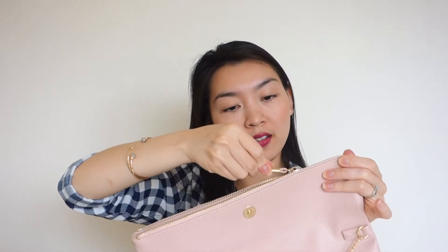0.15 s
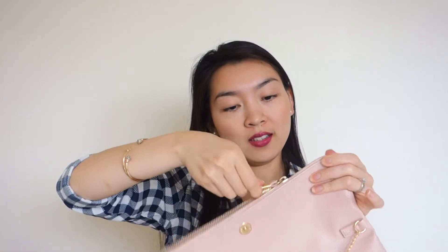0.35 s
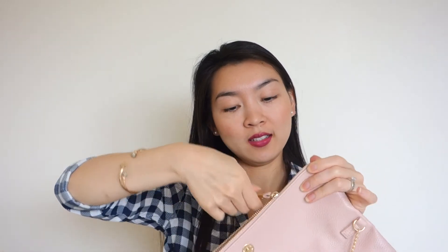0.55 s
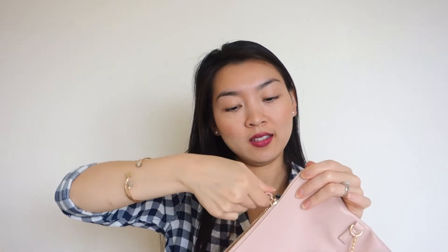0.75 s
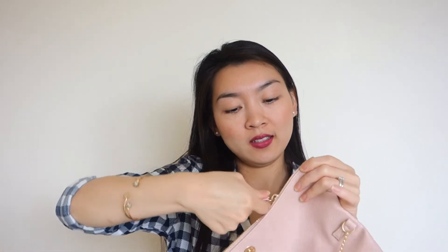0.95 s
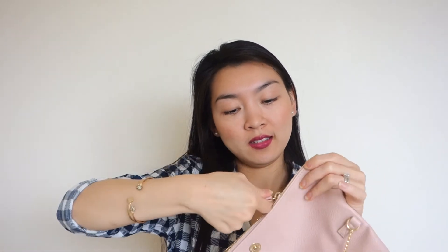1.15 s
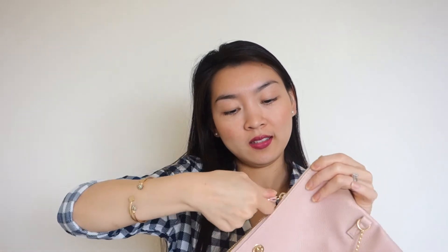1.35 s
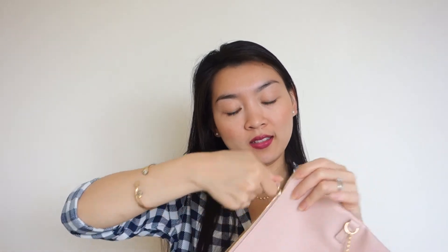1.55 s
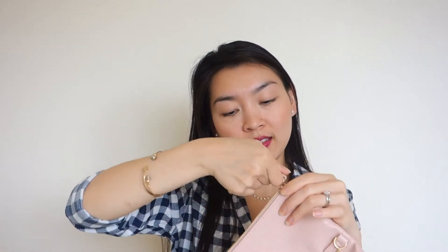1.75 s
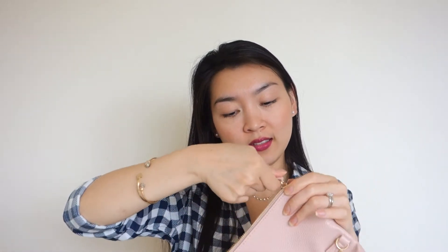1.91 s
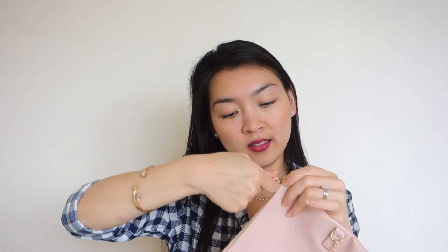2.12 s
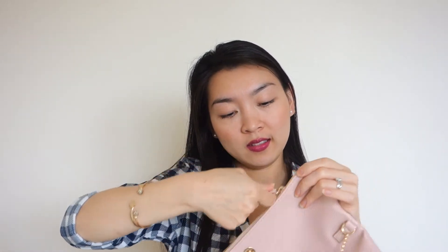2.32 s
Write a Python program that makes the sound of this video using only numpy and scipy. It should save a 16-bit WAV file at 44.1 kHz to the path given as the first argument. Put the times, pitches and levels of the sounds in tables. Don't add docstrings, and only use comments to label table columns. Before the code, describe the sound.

A small metal zipper on a leather clutch scrapes in short, uneven tugs in a bare room

```python
import sys
import numpy as np
from scipy import signal
from scipy.io import wavfile

SR = 44100
rng = np.random.default_rng(int(sys.argv[2]) if len(sys.argv) > 2 else 0)


def wrap_up_sound(samples):
    columns = np.atleast_2d(samples).T
    tamed = np.clip(columns, -1, 1)
    steps = np.round(tamed * 32767).astype(np.int16)
    wavfile.write(sys.argv[1], SR, steps)


def attenuation_scalar(level_db):
    decades = np.asarray(level_db, float) / 20
    return 10 ** decades


N = 104737

# start_s, scrape level_db, cloth tape shake_db (beside the scrape)
PULL = [(0.0, -38.5, -4.5), (.11, -47.5, -1), (.28, -42.5, 2.5), (.4, -41, -5), (.62, -56, 5),
        (.69, -48, -8), (.855, -49.5, -9), (.875, -39, -3.5), (1.14, -52, -0.5), (1.3, -42, -20),
        (1.42, -53, -9), (1.5, -39, 2.5), (1.65, -47.5, -5.5), (1.78, -43.5, 2.5), (1.84, -56.5, 5),
        (2.01, -55, -1), (2.07, -40.5, -13), (2.37, -47.5, 11)]
# pitch_hz, level_db
SCRAPE_TONE = [(500, -29), (1100, -6.5), (1600, -3), (3000, -1), (5000, -6), (7000, -6), (9000, -26),
               (15500, -43)]
TAPE_HZ, TAPE_WIDTH_HZ = 1570, 356
# start_s, level_db, rise_s, hold_s
TUGS = [(0.0, -49, 0.0022, 0.03), (0.188, -50.5, .03, 0.087), (0.329, -49, 0.0029, 0.011),
        (0.368, -48, 0.0077, 0.017), (0.453, -51.5, 0.0037, 0.023), (0.646, -59.5, 0.016, 0.032),
        (0.763, -65, 0.011, 0.084), (0.864, -45.5, .006, 0.077), (1.064, -56, .004, 0.019),
        (1.196, -52.5, 0.016, 0.048), (1.258, -50, 0.029, 0.023), (1.434, -42.5, 0.045, 0.069),
        (1.597, -49.5, .005, 0.025), (1.691, -53, 0.015, 0.037), (2.023, -50, 0.037, 0.16),
        (2.26, -54.5, 0.025, .1)]
TUG_FADE_DB_PER_S = 254
SNAP_DB, SNAP_S = 6, 0.01
# pitch_hz, level_db
RUSTLE_TONE = [(1500, -24.5), (3000, -6), (6000, 3), (8000, -1.5), (11000, -8), (15500, -10)]
# pitch_hz, width_hz, level_db
HARDWARE = [(1613, 23, -8.5), (1696, 28, -10.5), (2380, 49, -16), (2660, 26, -11), (2854, 39, -2),
            (3060, 28, -5.5), (3324, 68, 3), (3406, 35, 1.2), (4100, 48, -5), (4890, 65, -6.5),
            (5820, 50, -6), (6680, 183, -1), (8120, 100, -2.5), (11890, 140, -5.5)]
HARDWARE_DB = -5.5
# start_s, level_db
SQUEEZE = [(0.0, -51.5), (0.14, -65), (0.49, -57.5), (0.73, -66.5), (0.74, -59.5), (0.84, -58), (0.86, -53),
           (1.13, -67), (1.39, -64.5), (1.44, -51), (1.52, -35.5), (1.67, -55.5), (1.95, -70.5),
           (2.11, -61.5), (2.12, -53), (2.23, -54.5), (2.28, -44), (2.37, -40.5)]
# pitch_hz, level_db
LEATHER_TONE = [(60, -52), (150, -19.5), (280, -8), (500, -1.5), (800, 6.5), (1200, -6.5), (2500, -10),
                (6000, -17.5)]
# pitch_hz, width_hz, level_db
PANELS = [(302, 27, -5), (418, 35, 3), (532, 31, -0.5), (772, 39, -7.5), (1170, 37, -3.5)]
BASS_DB_PER_DB, PANEL_BASS_HZ = 0.13, 388
# pitch_hz, time to fall by 60 dB_s
WALLS = [(200, 0.33), (2000, 0.43), (6000, 0.25), (14000, 0.26)]
WALLS_DB = -8
# pitch_hz, level_db
HISS_TONE = [(25, -8), (100, -5), (300, -22), (1000, 9.5), (5000, -2.5), (15500, -2.5)]
HISS_DB = -63
# start_s, level_db above the scrape
CATCHES = [
    (.386, 9),
    (.449, 3),
    (0.881, 0),
    (1.53, 8),
    (2.07, -2),
    (2.122, 4.5),
    (2.208, 7),
]
CATCH_S = 0.0023
# pitch_hz, width_hz, level_db
BELLY = [(122, 30, -12), (186, 35, -2.5)]
BELLY_START_S, BELLY_RISE_S, BELLY_DB = 2.25, 0.055, -57.5
# pitch_hz, likeness (0 to 1)
LIKENESS = [(30, .7), (70, .85), (150, .985), (400, .985), (1000, .92), (2500, .79), (6000, .36),
            (12000, .16)]
# pitch_hz, difference_db
LEAN = [(60, 2), (240, 3), (950, 0.5), (3770, -1), (15000, -3.5)]
EDGES_HZ = 26 * 2 ** np.arange(0, 9.6, .5)
CUTOFF_HZ = 15800


def rms_one(x):
    return x / np.sqrt(np.mean(x ** 2) + 1e-20)


def in_time(rows, column=1):
    table = np.array(rows)
    return np.interp(np.arange(N) / SR, table[:, 0], table[:, column])


def at_hz(points, hz):
    table = np.array(points)
    return np.interp(np.log(hz), np.log(table[:, 0] + 1), table[:, 1])


def band_pass(x, low, high):
    return signal.sosfilt(signal.butter(2, [low, high], "band", fs=SR, output="sos"), x)


def resonate(x, hz, width):
    r = np.exp(-np.pi * width / SR)
    top = (1 - r * r) / 2 * np.array([1, 0, -1])
    bottom = [1, -2 * r * np.cos(2 * np.pi * hz / SR), r * r]
    return signal.lfilter(top, bottom, x)


def drift(rate):
    r = np.exp(-80 * np.pi * rate / SR)
    noise = rng.standard_normal(N // 40 + 2002)
    slow = signal.lfilter([1], [1, -2 * r, r * r], noise)[2000:]
    return np.interp(np.arange(N) / 40, np.arange(len(slow)), rms_one(slow))


def grains(per_s, spread_db, clump_db):
    shape = (2, 2, N)
    born = rng.random(shape) < per_s * attenuation_scalar(clump_db * drift(60)) / SR
    sizes = attenuation_scalar(spread_db * np.minimum(rng.exponential(1, shape), 5.0))
    signs = rng.choice([-1, 1], shape)
    return rms_one(born * sizes * signs) + 1e-18


def colour(streams, tone, patchy_db):
    out = 0
    for k, (low, high) in enumerate(zip(EDGES_HZ, EDGES_HZ[1:])):
        hz = np.sqrt(low * high)
        mid, side = band_pass(streams[k % 2], low, high)
        alike = np.clip(at_hz(LIKENESS, hz), 0, 1)
        balance = attenuation_scalar(at_hz(LEAN, hz) / 2 * np.array([[1], [-1]]))
        gain = attenuation_scalar(at_hz(tone, hz) + patchy_db * drift(10)) * balance
        out = out + gain * (np.sqrt(1 + alike) * mid + np.sqrt(1 - alike) * side * [[1], [-1]])
    return rms_one(out)


def slider():
    scrape = colour(grains(6000, spread_db=2.0, clump_db=2.0), SCRAPE_TONE, patchy_db=0.64)
    tape = attenuation_scalar(in_time(PULL, column=2)) * resonate(scrape, TAPE_HZ, TAPE_WIDTH_HZ)
    return attenuation_scalar(in_time(PULL) - 3.0 + catches_db()) * (scrape + tape)


def rustle():
    t = np.arange(N) / SR
    power = 0
    for start, db, rise, hold in TUGS:
        fade_db = -TUG_FADE_DB_PER_S * np.maximum(t - start - rise - hold, 0)
        snap_db = SNAP_DB * np.exp(-rise / SNAP_S - np.maximum(t - start - rise, 0) / SNAP_S)
        ramp = np.clip((t - start) / max(rise, .001), 0, 1)
        power = power + (attenuation_scalar(db + fade_db + snap_db) * ramp) ** 2
    noise = colour(grains(12000, spread_db=2.5, clump_db=3.5), RUSTLE_TONE, patchy_db=0.45)
    return np.sqrt(power) * noise


def hardware(x):
    ringing = sum(attenuation_scalar(db + HARDWARE_DB + 9.5) * resonate(x, hz, width) for hz, width, db in HARDWARE)
    return x + ringing


def leather():
    squeeze_db = in_time(SQUEEZE)
    rub = colour(grains(1200, spread_db=3.0, clump_db=2.0), LEATHER_TONE, patchy_db=1.8)
    deep = signal.sosfilt(signal.butter(2, PANEL_BASS_HZ, fs=SR, output="sos"), rub)
    bass_share = attenuation_scalar(BASS_DB_PER_DB * (squeeze_db - squeeze_db.max()))
    rub = attenuation_scalar(squeeze_db - 1.5) * (rub - (1 - bass_share) * deep)
    return rub + sum(attenuation_scalar(db) * resonate(rub, hz, width) for hz, width, db in PANELS)


def room(x):
    t = np.arange(SR // 2) / SR
    noise = rng.standard_normal(len(t))
    tail = 0
    for low, high in zip(EDGES_HZ[::2], EDGES_HZ[2::2]):
        fade = attenuation_scalar(-60 * t / at_hz(WALLS, np.sqrt(low * high)))
        tail = tail + band_pass(noise, low, high) * fade * (t > .004)
    tail = tail / np.sqrt(np.sum(tail ** 2))
    return signal.fftconvolve(x, tail[None], axes=1)[:, :N]


def hiss():
    return attenuation_scalar(HISS_DB) * colour(rng.standard_normal((2, 2, N)), HISS_TONE, patchy_db=0)


def catches_db():
    t = np.arange(N) / SR
    return sum(db * (t > start) * np.exp(-np.maximum(t - start, 0) / CATCH_S) for start, db in CATCHES)


def belly():
    noise = rng.standard_normal(N)
    hollow = sum(attenuation_scalar(db) * resonate(resonate(noise, hz, width), hz, width) for hz, width, db in BELLY)
    rise = np.clip((np.arange(N) / SR - BELLY_START_S) / BELLY_RISE_S, 0, 1)
    return attenuation_scalar(BELLY_DB) * rise * rms_one(hollow)


def scene():
    zipper = slider() + rustle()
    metal = signal.sosfilt(signal.butter(2, 400, "high", fs=SR, output="sos"), zipper)
    bag = hardware(metal) + leather() + belly()
    return attenuation_scalar(1) * (bag + attenuation_scalar(WALLS_DB) * room(bag)) + hiss()


def band_limit(x):
    return signal.sosfilt(signal.butter(12, 16290, fs=SR, output="sos"), x)


def record(dry):
    steep = signal.ellip(12, .5, 70, CUTOFF_HZ, fs=SR, output="sos")
    finished = signal.sosfilt(steep, dry)
    return band_limit(finished)


dry = scene()
out = record(dry)
wrap_up_sound(out)
```